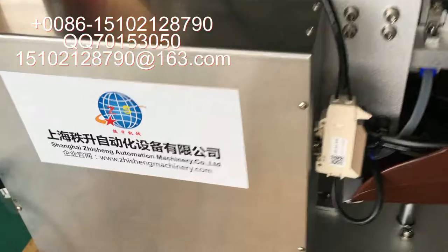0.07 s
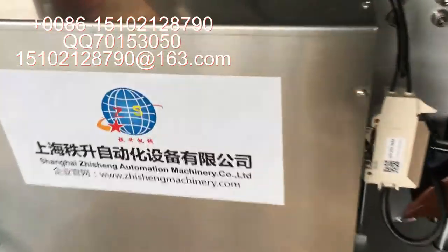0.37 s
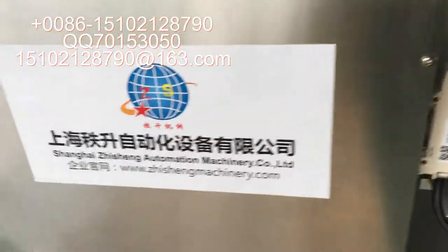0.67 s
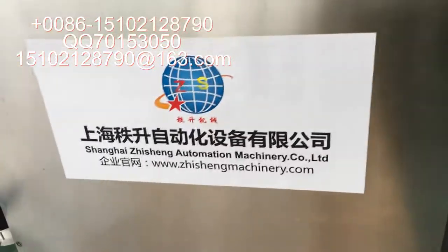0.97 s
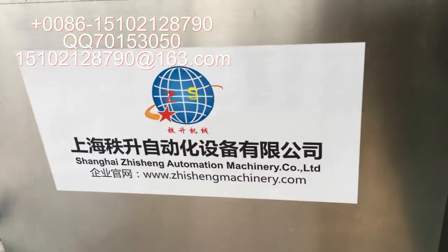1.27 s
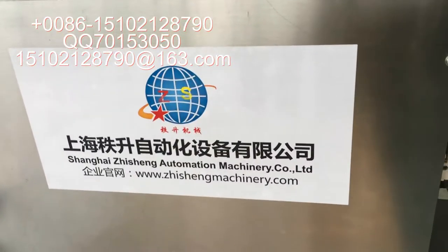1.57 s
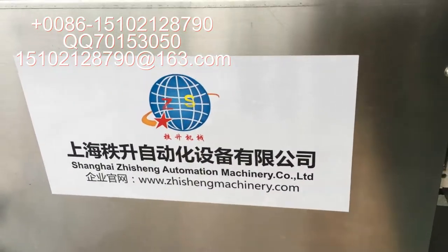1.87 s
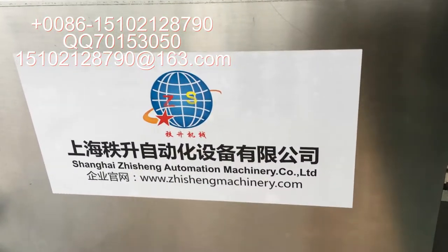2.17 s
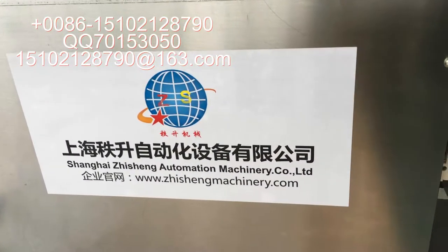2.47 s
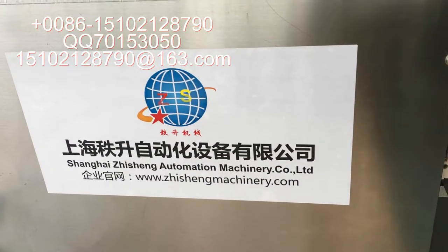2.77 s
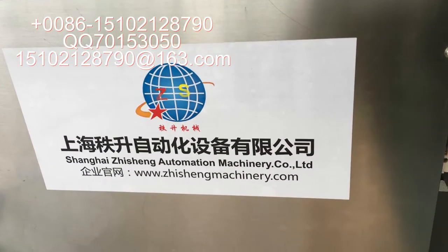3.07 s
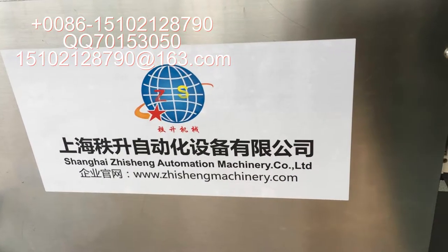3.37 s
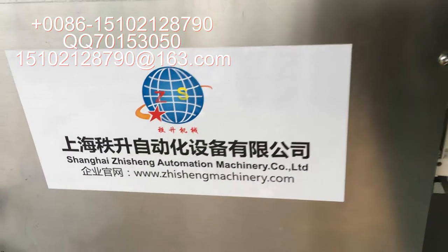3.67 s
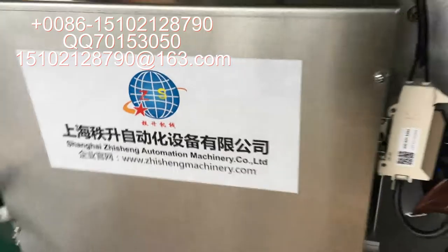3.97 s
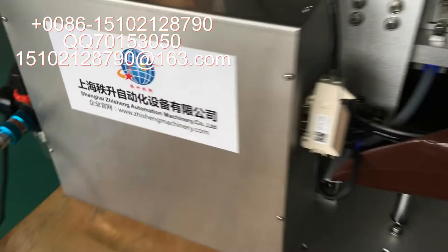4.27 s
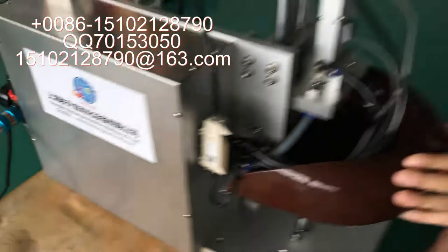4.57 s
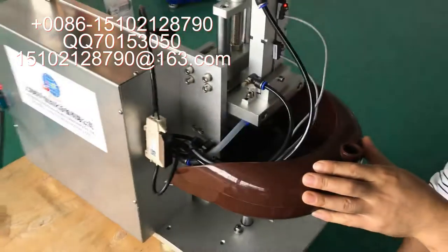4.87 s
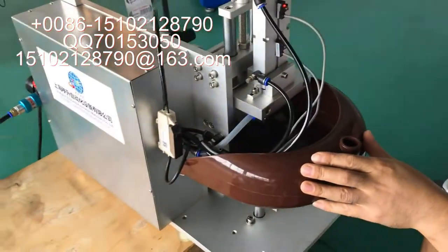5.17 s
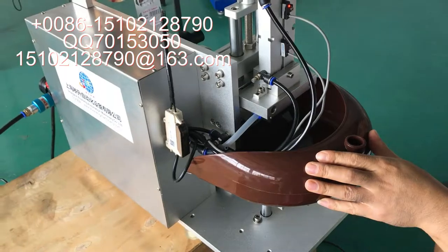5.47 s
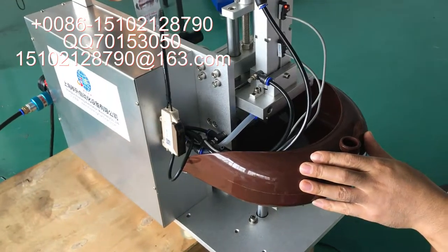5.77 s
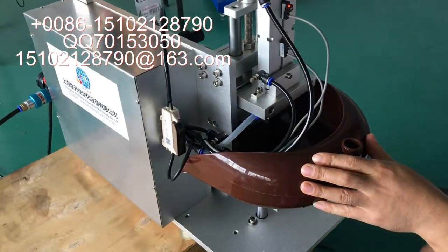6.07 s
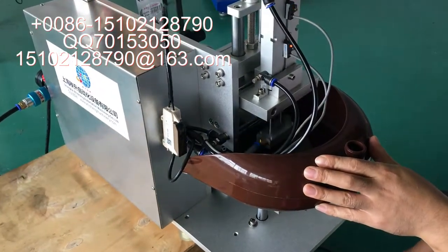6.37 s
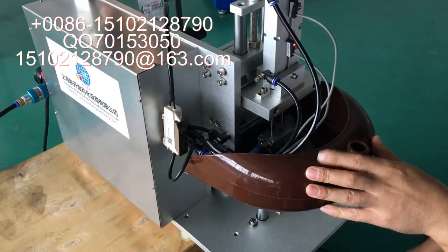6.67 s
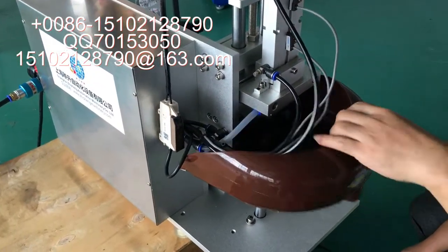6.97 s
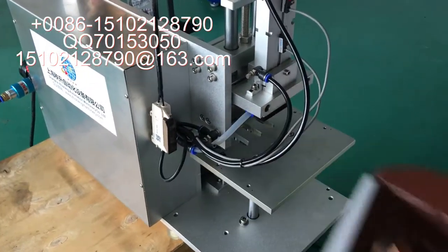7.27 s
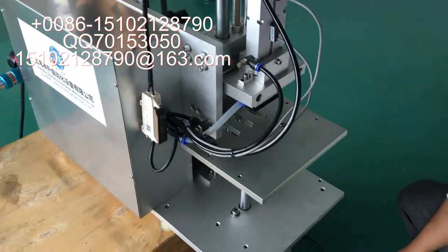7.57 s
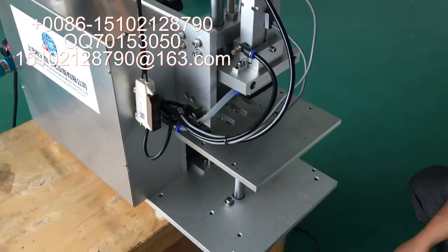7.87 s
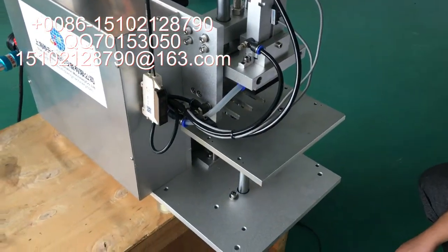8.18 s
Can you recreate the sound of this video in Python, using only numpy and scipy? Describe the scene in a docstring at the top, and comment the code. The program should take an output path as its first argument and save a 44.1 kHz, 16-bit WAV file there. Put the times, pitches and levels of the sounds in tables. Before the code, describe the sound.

In a reverberant workshop, a low rumble, motor hum and a faint air leak run for several seconds. Then a valve clacks and a pneumatic machine close by releases a loud burst of compressed air, lasting under a second, while latches click and slides knock against their metal stops. The air cuts off. A little farther away, a hollow plastic shell bumps and scrapes as it is pulled off, and is put down with a sharp knock.

```python
"""Pneumatic assembly machine, one cycle

In a reverberant workshop, over low rumble and a small air leak, a valve opens: air blasts for
most of a second, latches clack and the slides knock against their stops in the steel frame.
The hollow plastic shell is then pulled off the fixture, bumping and scraping, and put down."""
import sys
import numpy as np
from scipy import signal
from scipy.fft import rfft, irfft, next_fast_len
from scipy.io import wavfile
from scipy.ndimage import uniform_filter1d

SR = 44100
rng = np.random.default_rng(int(sys.argv[2]) if len(sys.argv) > 2 else 0)


def put_to_file(sound):
    """Save the sound as 16-bit audio at rate SR, in the file named by the first command-line argument."""
    columns = np.atleast_2d(sound).T  # one column per channel
    safe = np.clip(columns, -1, 1)
    whole_steps = np.round(safe * 32767)
    wavfile.write(sys.argv[1], SR, whole_steps.astype(np.int16))


N = 362502
T = np.arange(N) / SR


def amp(db):
    """Decibels to gain."""
    return 10 ** (np.asarray(db) / 20)


def unit(x):
    """Scale to rms 1."""
    return x / np.sqrt(np.mean(x ** 2) + 1e-20)


def at_hz(points, hz):
    """Read a table on a log-frequency axis."""
    f, value = np.transpose(points)
    return np.interp(np.log(hz), np.log(f), value)


def band(x, low_hz, high_hz, order=2):
    """Causal band-pass."""
    sos = signal.butter(order, [low_hz, high_hz], "band", fs=SR, output="sos")
    return signal.sosfilt(sos, x + 1e-18)


def drift(per_s):
    """Random modulation with a spread near 1."""
    knots = rng.standard_normal(4096)
    return np.interp(T * per_s, np.arange(len(knots)), knots)


def swell(peak_s, length_s):
    """A smooth rise and fall, above half height for the given length."""
    return np.exp(-np.log(2) * np.minimum((2 * (T - peak_s) / length_s) ** 2, 60))


def noise(spectrum, peaks=()):
    """Coloured noise with resonant humps; rms 1."""
    size = next_fast_len(N, real=True)
    hz = np.maximum(np.fft.rfftfreq(size, 1 / SR), 1)
    humps_db = sum(boost / (1 + (2 * (hz - f) / width) ** 2) for f, width, boost in peaks)
    colour = amp(at_hz(spectrum, hz) + humps_db)
    return unit(irfft(rfft(rng.standard_normal(size)) * colour, size)[:N])


def band_noise(low_hz, high_hz):
    """One band of noise; rms 1."""
    return unit(band(rng.standard_normal(N), low_hz, high_hz))


def add(out, s, sound):
    """Mix a short sound in at its time."""
    at = int(s * SR)
    out[at:at + len(sound)] += sound[:N - at]


def ring(modes, rise_s):
    """Decaying sines of a struck body; they swell while the contact lasts."""
    t = T[:SR]
    attack = 1 - np.exp(-(t / rise_s) ** 2)
    return attack * sum(amp(db - 60 * t / t60) * np.sin(2 * np.pi * hz * t) for hz, db, t60 in modes)


def burst(decay_s, rise_s=0.00048):
    """Rough contact: a fast-dying swarm of tiny impacts that excites all frequencies evenly."""
    t = T[:SR // 5]
    envelope = (1 - np.exp(-t / rise_s)) * np.exp(-t / decay_s)
    swarm = rng.standard_normal(len(t))
    for _ in range(3):   # flatten the spectrum, then the level
        even = irfft(np.exp(1j * np.angle(rfft(swarm * envelope))), len(t))
        swarm = even / np.sqrt(np.abs(uniform_filter1d(even ** 2, size=32)) + 1e-12)
    return swarm * envelope


def at_level(sound, db, decay_s):
    """Give a hit the energy of a decay that starts at this rms level."""
    return amp(db) * sound * np.sqrt(decay_s * SR / 2 / np.sum(sound ** 2))


# reverb time of the workshop: f/Hz, t60/s
ROOM_T60 = [(100, 0.49), (300, 0.56), (900, 1.17), (2500, 2.02), (6000, 1.52), (12000, 1.4)]

def workshop_reverb(x, build_s=0.00093):
    """The hall's diffuse tail builds up, then dies band by band."""
    t, edges, tail = T[:2 * SR], np.geomspace(70, 14000, 12), 0
    for low, high in zip(edges, edges[1:]):
        t60 = at_hz(ROOM_T60, np.sqrt(low * high))
        tail += band(rng.standard_normal(len(t)), low, high) * amp(-60 * t / t60)
    tail *= 1 - np.exp(-t / build_s)
    return signal.fftconvolve(x, tail / np.sqrt(np.sum(tail ** 2)))[:N]


# echoes off the steel cover, bench and floor: delay/s, gain/dB
PANELS = [(.0021, -27), (.0043, -27), (.0077, -18.5), (0.0113, -20.5), (0.015, -33)]

def early_reflections(x):
    """Nearby hard surfaces add short echoes that comb the spectrum."""
    return x + sum(amp(db) * np.interp(T - delay_s, T, x) for delay_s, db in PANELS)


# colour of the rumble: f/Hz, relative level/dB
RUMBLE = [(15, -39), (25, -33), (33, -6), (42, -11.5), (52, 2), (68, 2.5), (90, -6), (110, -7), (145, -12),
          (200, -10.5), (250, -14.5), (300, -17), (400, -29), (600, -41), (1300, -76)]

def rumble(level_db=-42, surge_db=1.5, churn_db=1.0, split_hz=140):
    """Low bed of other machines; its deep and upper parts surge independently."""
    drone = noise(RUMBLE)
    deep = signal.sosfiltfilt(signal.butter(3, split_hz, fs=SR, output="sos"), drone)
    upper = drone - deep
    return amp(level_db + surge_db * drift(7.2)) * deep + amp(level_db + churn_db * drift(14)) * upper


# the listener's path round the cover: t/s, position (0 in front, 1 beside)
LISTENER_PATH = [(0, 0.25), (.8, 0.0039), (4.0, 0.022), (4.6, 0.44), (5.1, 1)]

def listener_position():
    """Perspective moves between the front of the machine's cover and its side."""
    return np.interp(T, *np.transpose(LISTENER_PATH))


# motor partials: f/Hz, level in front/dB, level beside/dB
HUM = [(51, -50.5, -53), (99.7, -52, -56), (198.8, -61, -56), (287.5, -67, -55), (810, -72, -86),
       (886, -75, -72.5)]

def motor_hum(waver_db=4.5, wander_rad=0.63):
    """Wavering motor tones whose balance shifts as the listener moves."""
    beside, out = listener_position(), 0
    for hz, front_db, side_db in HUM:
        rms = amp(front_db + beside * (side_db - front_db) + waver_db * drift(6))
        out += rms * np.sqrt(2) * np.sin(2 * np.pi * hz * T + wander_rad * drift(6))
    return out


# colour of the room tone: f/Hz, relative level/dB
ROOM_TONE = [(300, 9), (550, 4), (720, 0.5), (850, 2), (1100, 0), (2000, -2.5), (4000, -9), (6200, -5),
             (9000, -8), (12000, -11.5)]

def room_tone(level_db=-53):
    """The workshop's even hiss."""
    return amp(level_db) * noise(ROOM_TONE)


# colour of the leak: f/Hz, relative level/dB
LEAK = [(900, -10.5), (1600, 0), (2400, -3.5), (3000, 4), (3900, -7), (4600, 6.5), (5050, -3.5), (6000, 4),
        (6900, 5.5), (7600, -1.5), (8400, 4.5), (10600, -1.5), (11600, 5.5), (12500, -14)]
# spells of whistling: peak t/s, length/s, level/dB
WHISTLES = [(3.6, .32, -64.5), (3.928, 0.1, -65), (4.32, .15, -70)]

def leak(level_db=-55.5, shadow_db=12.5, flicker_db=0.8, whistle_hz=2910, width_hz=57):
    """A leaking air coupling hisses, fainter beside the cover, and now and then whistles."""
    hiss = amp(level_db - shadow_db * listener_position() + flicker_db * drift(12)) * noise(LEAK)
    whistle = band_noise(whistle_hz - width_hz / 2, whistle_hz + width_hz / 2)
    return hiss + whistle * sum(amp(db) * swell(s, length_s) for s, length_s, db in WHISTLES)


# soft strokes: peak t/s, length/s, level/dB, low f/Hz, high f/Hz
RUBS = [(0.275, 0.14, -55.5, 332, 575), (5.21, 0.21, -57, 1830, 4200)]

def rubs():
    """Friction noise swells and fades as a hand rubs and the shell slides into place."""
    return sum(amp(db) * swell(s, length_s) * band_noise(low_hz, high_hz)
               for s, length_s, db, low_hz, high_hz in RUBS)


# damped resonances of the plastic: f/Hz, width/Hz, gain/dB
PLASTIC = [(198, 140, 3.5), (324, 146, 3), (434, 30, 1), (640, 100, -2), (794, 150, -6), (980, 220, -4),
           (1210, 180, -1.5), (1250, 62, 2), (1550, 140, -5), (2000, 380, -4), (2610, 560, -8),
           (3217, 210, -4), (4150, 550, -11.5), (6160, 700, -9), (9000, 3400, -15.5)]
# modes of the shell's hollow: f/Hz, relative level/dB, t60/s
HOLLOW = [(323, -5.5, 0.1), (614, -0.5, 0.05), (778, 1, 0.045), (910, -11.5, 0.07), (1213, -3.5, 0.053),
          (1356, -5.5, 0.041), (1566, -9.5, 0.051), (2000, -19, 0.049)]
# modes of the bench: f/Hz, relative level/dB, t60/s
BENCH = [(57, -5, 0.37), (107, 2, 0.12), (139, 2, 0.058)]
# shell handling, and a bump on the bench at 4.8 s: t/s, level/dB, brightness f/Hz, decay/s, hollow gain/dB,
# bench gain/dB
SHELL_HITS = [(4.808, -34, 158, 0.0055, -77, -35), (7.048, -31, 2980, 0.026, -32.5, -30.5),
              (7.076, -33.5, 2500, 0.0078, -51, -29), (7.102, -30, 4500, 0.0078, -30.5, -45),
              (7.110, -28.5, 800, 0.0083, -27, -27), (7.158, -60, 1200, 0.014, -50, -30.5),
              (7.202, -32, 4500, 0.0024, -40, -46), (7.229, -38.5, 9050, 0.027, -60, -47),
              (7.268, -36.5, 5130, 0.018, -49, -35), (7.467, -43, 2500, 0.025, -42.5, -58),
              (7.9573, -16.5, 3500, 0.0041, -19, -30)]

def shell():
    """Bumps and scrapes excite the plastic's resonances, ring its hollow and shake the bench."""
    out = np.zeros(N)
    bench, hollow = ring(BENCH, rise_s=0.0034), ring(HOLLOW, rise_s=0.001)
    for s, db, bright_hz, decay_s, hollow_db, bench_db in SHELL_HITS:
        contact, body = band(burst(decay_s), 130, bright_hz, order=1), 0
        for k, (hz, width, gain_db) in enumerate(PLASTIC):
            resonance = signal.lfilter(*signal.iirpeak(hz, hz / width, fs=SR), contact)
            body += (-1) ** k * amp(gain_db) * resonance   # alternate polarity avoids deep notches
        add(out, s, at_level(body, db, decay_s))
        add(out, s, amp(hollow_db) * hollow + amp(bench_db) * bench)
    return out


# hard clacks: t/s, body level/dB, low f/Hz, high f/Hz, decay/s, tick level/dB
CLACKS = [(5.677, -36, 3800, 5000, 0.01, -37), (5.691, -30, 3500, 7000, 0.0034, -41),
          (5.724, -18.5, 1180, 2030, 0.013, -20.5), (6.165, -17, 1440, 2580, 0.0056, -36),
          (6.313, -15.5, 2800, 11900, 0.0048, -28), (7.031, -16.5, 1470, 2000, 0.0027, -17.5),
          (7.9575, -23.5, 1800, 2220, 0.0063, -24.5)]

def clacks(tick_hz=(2770, 4700), tick_s=0.0017):
    """Valves, latches and the shell's rim snap: a bright tick over a body in the part's own register."""
    out = np.zeros(N)
    for s, db, low_hz, high_hz, decay_s, tick_db in CLACKS:
        add(out, s, at_level(band(burst(tick_s), *tick_hz), tick_db, tick_s))
        add(out, s, at_level(band(burst(decay_s), low_hz, high_hz), db, decay_s))
    return out


# thud modes of the steel frame: f/Hz, relative level/dB, t60/s
FRAME_MODES = [(157, -13, 0.055), (199.3, 0, 0.06), (237, -7.5, 0.059), (220.6, -16.5, 0.3),
               (248.5, -13, 0.26), (263, -40, 0.22)]
# ringing modes of its plates: f/Hz, relative level/dB, t60/s
PLATE_MODES = [(658, -14.5, 0.043), (672, -28, 0.32), (824, -12.5, 0.028), (848, -5.5, 0.026),
               (911, -27, 0.32), (1149, -17.5, 0.12), (1280, -15, 0.036), (1290, -33, 0.26),
               (1785, -22.5, 0.08), (1976, -28, 0.054)]
# parts seating and slides hitting their stops: t/s, thud gain/dB, ring gain/dB, crack level/dB
KNOCKS = [(5.296, -83, -42, -72), (5.516, -62, -37.5, -60), (5.678, -45, -25, -34),
          (5.705, -23.5, -6.5, -41), (6.229, -16.5, -16.5, -43), (6.490, -11, -11.5, -46),
          (6.739, -25.5, -26, -34), (6.753, -14, -9.5, -21.5), (6.851, -55, -28, -71)]

def frame_knocks(crack_s=0.0051, bounce_s=0.025, bounce_thud_db=-12.5, bounce_ring_db=-18):
    """Each slide thuds into the frame, rings its plates, cracks at the contact and bounces once."""
    out = np.zeros(N)
    plates = ring(PLATE_MODES, rise_s=0.0012)
    thud = band(ring(FRAME_MODES, rise_s=0.0025), 62, 325)   # the heavy frame answers only low down
    for s, thud_db, ring_db, crack_db in KNOCKS:
        crack = band(burst(crack_s, rise_s=0.0022), 1600, 13000, order=1)
        bounce = amp(thud_db + bounce_thud_db) * thud + amp(ring_db + bounce_ring_db) * plates
        add(out, s, amp(thud_db) * thud + amp(ring_db) * plates)
        add(out, s, at_level(crack, crack_db, crack_s))
        add(out, s + bounce_s, bounce)
    return out


# exhaust puffs: peak t/s, length/s, relative level/dB, centre f/Hz
PUFFS = [(6.342, .04, -25, 3670), (6.363, 0.015, -24, 4150), (6.394, 0.037, -23.5, 7200)]

def exhaust(width_octaves=0.85, sputter_db=2.0):
    """A cylinder vents through its muffler in sputtering puffs of hiss, higher as it empties."""
    puffs = [(amp(db) * swell(s, length_s), hz) for s, length_s, db, hz in PUFFS]
    edges, out = np.geomspace(1500, 12500, 10), 0
    for low, high in zip(edges, edges[1:]):
        band_hz = np.sqrt(low * high)
        level = sum(puff / (1 + (np.log2(band_hz / hz) / width_octaves) ** 2) ** 2 for puff, hz in puffs)
        out += level * amp(sputter_db * drift(140)) * band_noise(low, high)
    return out / 2


# colour of the jet: f/Hz, relative level/dB
BLAST = [(120, -13), (250, 0.5), (350, -8.5), (470, -14), (620, -5), (1100, -6.5), (1800, -0.5), (2750, -7),
         (3400, -4.5), (4900, -3.5), (5400, 1.5), (6700, 1), (7600, -5.5), (9000, -2.5), (10400, -7.5),
         (12000, -2)]
# cavity resonances on the jet: f/Hz, width/Hz, boost/dB
CAVITIES = [(620, 58, 4.8), (870, 33, 2.5), (1150, 39, 4.6), (1280, 46, 8.5), (1610, 76, 8.9),
            (1940, 80, 3.3), (2430, 35, 2.7), (2600, 70, 3), (3090, 74, 6.1), (3410, 110, 6.7),
            (3560, 76, 5.4), (4540, 160, 2.5), (5305, 80, 6.9), (5500, 55, 4.7), (5900, 80, 2.5),
            (6150, 50, 2.6), (6200, 55, 4.5), (6550, 57, 4), (6870, 70, 7.6), (7300, 130, 3),
            (8500, 230, 3.8), (8770, 110, 7.4), (10740, 100, 5.1), (11300, 370, 3.4)]

def air_blast(open_s=5.706, shut_s=6.496, level_db=-25.5, rise_db_per_s=1.1, flutter_db=1.04):
    """Turbulent jet: starts with the valve, grows slightly and bleeds away quickly once it shuts."""
    attack = np.clip((T - open_s) / 0.0036, 0, 1)
    release = np.exp(-np.clip(T - shut_s, 0, 1) / 0.0071)
    jet_db = level_db + rise_db_per_s * (T - open_s) + flutter_db * drift(90)
    return attack * release * amp(jet_db) * noise(BLAST, CAVITIES)


def scene():
    """The machine is close; the shell is handled farther off and so sounds wetter."""
    jets = early_reflections(air_blast() + exhaust())
    latches = early_reflections(clacks())
    frame, plastic = frame_knocks(), shell()
    bed = rumble() + motor_hum() + room_tone() + leak() + rubs()
    # the reverb send is duller than the direct sound
    send = (amp(-11) * band(jets, 200, 5600, order=1) + amp(-6.5) * frame
            + amp(-12) * latches + amp(-5) * band(plastic, 130, 2200, order=1))
    mid = bed + jets + frame + latches + plastic + workshop_reverb(send)
    # faint stereo width in two narrow bands, near 1 kHz and 4.5 kHz
    spread = workshop_reverb(send + amp(-5) * bed)
    side = amp(-16) * band(spread, 790, 1475, order=6) + amp(-14.5) * band(spread, 3830, 5100, order=6)
    return np.array([mid + side, mid - side])


def record(dry, start_s=0.069, cutoff_hz=12080):
    """The sound cuts in after an instant of silence; a steep low-pass takes off the top."""
    low_pass = signal.ellip(12, .1, 80, cutoff_hz, fs=SR, output="sos")
    return signal.sosfilt(low_pass, dry * (T > start_s))


dry = scene()
out = record(dry)
put_to_file(out)
```